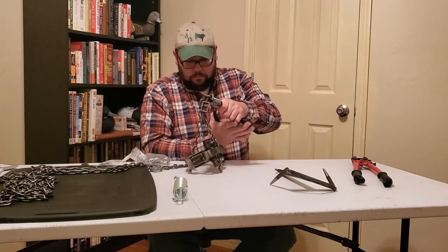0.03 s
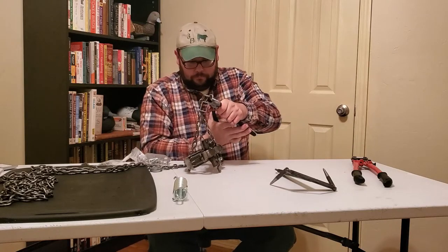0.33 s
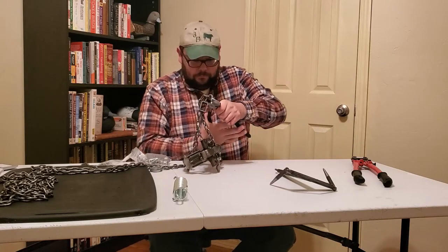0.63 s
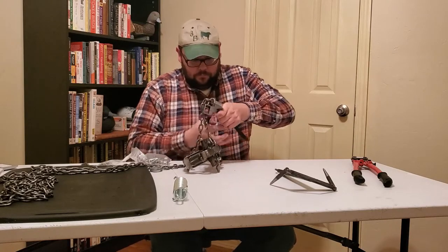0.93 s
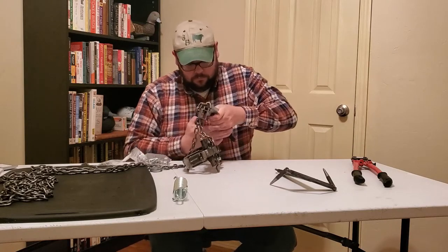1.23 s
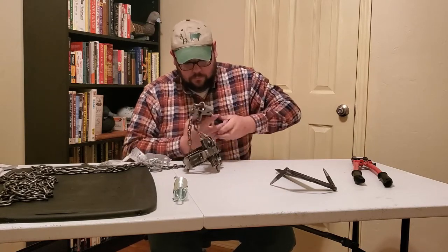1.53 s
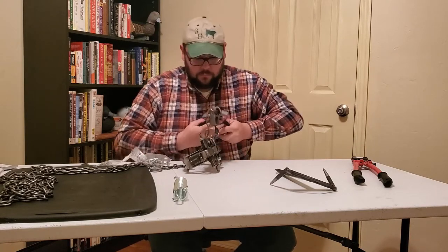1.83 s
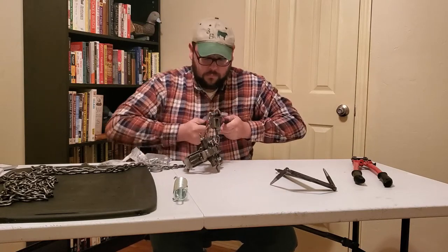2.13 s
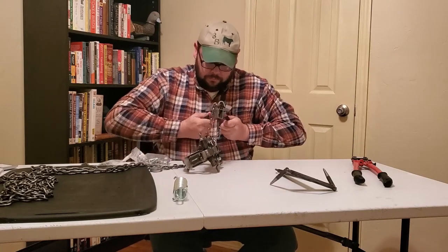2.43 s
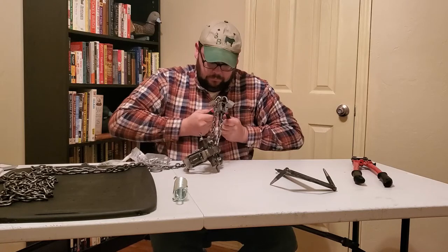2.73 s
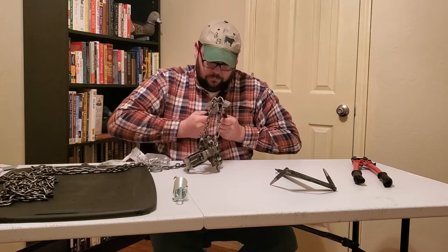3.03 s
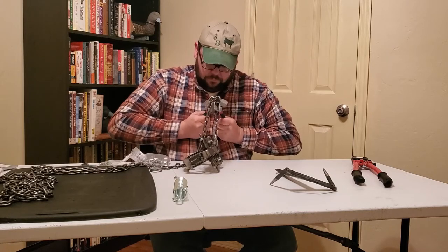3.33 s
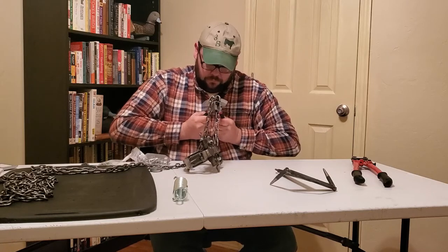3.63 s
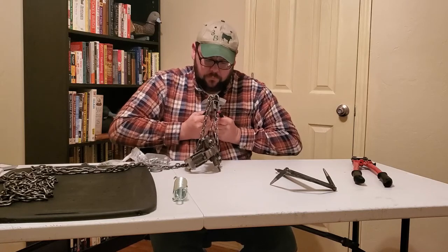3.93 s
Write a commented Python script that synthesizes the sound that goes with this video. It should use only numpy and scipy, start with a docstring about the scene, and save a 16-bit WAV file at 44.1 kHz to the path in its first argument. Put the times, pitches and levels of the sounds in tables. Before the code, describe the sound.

A chain and steel trap are handled, starting with a few light clicks. From about 0.8 seconds the links clash and jangle in quick, uneven runs, with hollow knocks on a table. The rattle is brightest around 2 and 2.8 seconds, thins after 3, nearly pauses, then clatters again with a knock near 3.9. It sounds a few metres away in a small, reverberant room.

```python
"""Steel trap and chain on a table

A trap and its chain are handled in a small, live room, a few metres away. Links clash in short runs of
impacts that excite the damped modes of the steel; between the clashes the chain keeps jostling.
Now and then the trap knocks on the hollow table top, which resonates. Reverberation outweighs the
direct sound, and a faint hush lies beneath."""
import sys
import numpy as np
from scipy import signal
from scipy.fft import rfft, irfft, next_fast_len
from scipy.io import wavfile

SR = 44100
rng = np.random.default_rng(int(sys.argv[2]) if len(sys.argv) > 2 else 0)


def store_pcm(level_fs):
    """Save levels as 16-bit WAV."""
    pcm = np.round(np.clip(level_fs, -1, 1) * 32767).astype(np.int16)
    wavfile.write(sys.argv[1], SR, np.atleast_2d(pcm).T)


N = 176400

# All table levels are relative. Clashes of chain and trap: (t/s, body/dB, ring/dB, sparkle/dB)
CLASH_EVENTS = [(0.001, -43, -42, -45), (0.355, -50, -61, -61), (0.572, -50, -57, -66),
                (0.765, -35.5, -36, -47), (0.805, -24, -27, -29), (0.915, -28.5, -25.5, -26.5),
                (1.079, -30.5, -28.5, -24), (1.105, -25, -29, -31), (1.203, -26.5, -28, -27.5),
                (1.222, -28.5, -38.5, -34), (1.368, -36, -26, -23.5), (1.404, -24.5, -31.5, -30.5),
                (1.471, -42, -29, -29), (1.645, -38, -26, -40), (1.674, -40, -34, -27),
                (1.77, -40, -25.5, -23), (1.893, -36, -24.5, -22), (1.911, -43, -20, -24.5),
                (1.932, -24.5, -24, -23), (1.988, -30, -23, -21.5), (2.098, -31, -28.5, -32.5),
                (2.215, -53, -35.5, -30.5), (2.27, -35, -30, -27), (2.33, -28.5, -33, -37),
                (2.339, -29.5, -36.5, -26), (2.419, -30, -28, -24.5), (2.508, -28, -24, -26),
                (2.63, -24.5, -25, -27), (2.667, -49, -37, -28), (2.711, -52, -25.5, -23.5),
                (2.758, -27, -25.5, -28.5), (2.811, -27, -17, -20), (2.937, -23, -35, -43),
                (3.08, -30, -34.5, -40), (3.095, -30, -29.5, -31), (3.197, -60, -36.5, -32.5),
                (3.271, -35.5, -29.5, -34), (3.416, -51, -40, -37), (3.44, -35, -37, -38),
                (3.584, -36, -58, -71), (3.823, -44.5, -48.5, -57), (3.895, -45, -39, -44.5),
                (3.923, -28, -41, -53), (3.938, -49, -26.5, -26)]
# modes of the trap's frame: (f/Hz, level/dB, T60/s)
FRAME_MODES = [(1703, -6.5, 0.11), (1843, -2, 0.048), (2092, -3.5, 0.028), (2343, -8, 0.07),
               (2675, -12, 0.056), (3545, 0.5, 0.017), (4195, -21.5, 0.053)]
# spectral envelope of the links: (f/Hz, level/dB)
LINK_SPECTRUM = [(120, -18), (600, -2.5), (1050, 1), (1350, -0.5), (1850, 5), (2800, -3.5), (3900, 0),
                 (6200, -3.5), (8000, -12), (9500, -6), (11500, -7), (13000, -2), (15500, -10.5)]
# strikes on parts that swing free: (t/s, part, level/dB)
PING_EVENTS = [(.001, "jaw", -55), (0.571, "jaw", -51.5), (.763, "jaw", -38.5), (0.915, "jaw", -34),
               (1.203, "jaw", -35.5), (1.222, "jaw", -54), (1.372, "swivel", -36), (1.47, "swivel", -27),
               (1.675, "swivel", -24), (1.77, "jaw", -27.5), (1.771, "base", -36.5), (1.906, "base", -35),
               (1.935, "spring", -30.5), (2.096, "clip", -35.5), (2.339, "spring", -28),
               (2.508, "swivel", -29.5), (2.634, "spring", -41), (2.836, "swivel", -23.5),
               (3.093, "clip", -35), (3.442, "clip", -43), (3.5, "spring", -47)]
# modes of each free part: (f/Hz, level/dB)
PING_MODES = {"jaw": [(1885, -12), (3684, 7), (3790, -15), (5600, -2)], "base": [(1045, -2), (1110, -4.5),
              (1900, 3.5)], "spring": [(1850, 8), (1950, 5), (3590, 10.5), (5520, 7)],
              "swivel": [(9000, -3), (9566, -3), (12200, 1.5), (12600, 0), (12900, 1), (14400, 0),
              (14900, 2.5), (15300, -11)], "clip": [(9480, 11.5), (10430, 13.5)]}
# decay of each free part: T60/s
PING_T60_S = {"jaw": .045, "base": .06, "spring": .025, "swivel": .02, "clip": .05}
# knocks on the table: (t/s, boom/dB, thump/dB, clack/dB, hollow note f/Hz, hollow note level/dB)
KNOCK_EVENTS = [(0.371, -54.5, -59, -75, 128, -54.5), (0.777, -51.5, -43, -48, 163, -56),
                (0.817, -58, -40.5, -42, 717, -34), (1.09, -52.5, -42, -47.5, 325, -46),
                (1.24, -62, -42.5, -43, 314, -45), (1.403, -56, -41, -31, 378, -33.5),
                (2.572, -52, -45, -39.5, 280, -53), (2.775, -51, -47.5, -40, 686, -43.5),
                (2.869, -50, -50, -57, 128, -44), (2.937, -50.5, -40, -34.5, 296, -39),
                (3.079, -52.5, -44, -38, 500, -34.5), (3.583, -66, -52, -47, 520, -42),
                (3.921, -48, -39.5, -41, 543, -35), (3.951, -43, -50, -49, 720, -43)]
# modes of the table top: (f/Hz, level/dB, T60/s)
TOP_MODES = [(123.7, -6, 0.2), (215.7, -6, 0.18), (266, 9, 0.078), (360.5, 4.5, 0.086), (525, 8, 0.046),
             (671, 10.5, 0.056)]
# spectral envelope of an impact on the top: (f/Hz, level/dB)
TOP_SPECTRUM = [(30, -45), (65, -2), (125, -7.5), (260, 5.5), (450, 2.5), (800, -5), (1200, -2),
                (2000, -15.5), (6000, -54)]
# strength of the jostling: (t/s, links/dB, dragging/dB)
JOSTLE_LEVELS = [(0, -86, -45), (.33, -71, -102), (.42, -58.5, -55), (.74, -58, -56), (.9, -33.5, -43.5),
                 (1.33, -36.5, -41), (1.8, -33, -43), (2.22, -46, -47), (2.6, -29, -39), (3.05, -49, -46.5),
                 (3.499, -38.5, -49), (3.63, -63.5, -59), (3.8, -59.5, -51), (4, -24.5, -44)]
# reverberation time: (f/Hz, T60/s)
REVERB_TIMES = [(100, 0.69), (400, 0.39), (2000, 0.63), (5000, 0.48), (10000, 0.45), (16000, 0.28)]
# coherence of the diffuse field: (f/Hz, left-right correlation)
FIELD_COHERENCE = [(100, 0.74), (300, 0.8), (700, 0.19), (1500, 0.024), (8000, 0.0055)]
# balance of the diffuse field: (f/Hz, left over right/dB)
FIELD_BALANCE = [(100, 0.5), (700, -0.5), (1400, 3.5), (2800, 0.5), (5500, -1), (10000, -1), (15000, 1.5)]
# spectrum of the still room: (f/Hz, level/dB)
HUSH_SPECTRUM = [(28, -43), (59, 11), (184, -8.5), (345, 6.5), (426, -10), (1720, -6), (16000, -65)]

CLASH_DB, PING_DB, KNOCK_DB, LINKS_DB, DRAG_DB, HUSH_DB = -6, .5, 2.5, -3.5, -2, -63.5
CRACK_DB, FRAME_DB, TOP_RING_DB = 3.5, -7, -1.5
BODY_EDGE_HZ, SPARKLE_EDGE_HZ, CUTOFF_HZ = 2820, 8120, 16100
BOOM_EDGE_HZ, THUMP_EDGE_HZ, HOLLOW_WIDTH_OCT = 137.5, 365, 0.4
LINK_T60_S, CRACK_T60_S, KNOCK_T60_S = 0.024, 0.013, 0.017
CLASH_RUN_S, KNOCK_RUN_S, SWIVEL_RUN_S = .022, 0.027, 0.0088  # spans of the bouncing
BOUNCES, BOUNCE_DB, BOUNCE_SPREAD_DB, SWIVEL_BOUNCE_DB = 6, -2, 4.5, -1
JOSTLES_PER_S, JOSTLE_SPREAD_DB, JOSTLE_DULL_HZ, DRAG_LOW_CUT_HZ = 130, 3, 9200, 179
DIRECT_DB, FIRST_ECHO_S, BUILD_UP_S = -11, 0.001, 0.0022
HIT_SAMPLES = SR // 3
HIT_SCALE = np.sqrt(.04 * SR)  # turns unit energy into unit power over 40 ms


def clashes():
    """Impacts excite a broad spectrum; each clash divides its energy differently among three bands."""
    out = np.zeros((2, N))
    for start, body_db, ring_db, sparkle_db in CLASH_EVENTS:
        hit = steel(CLASH_RUN_S)
        body = from_db(body_db) * unit(cut(hit, BODY_EDGE_HZ, "low"))
        ring = from_db(ring_db) * unit(cut(hit, [BODY_EDGE_HZ, SPARKLE_EDGE_HZ], "band"))
        sparkle = from_db(sparkle_db) * unit(cut(hit, SPARKLE_EDGE_HZ, "high"))
        add(out, start, body + ring + beamed(sparkle))
    return from_db(CLASH_DB) * HIT_SCALE * out


def steel(run_s, modes=40, bands=28):
    """Impact excitation: steel on steel cracks and sets the links and the frame in free vibration."""
    hz = rng.uniform(1510, CUTOFF_HZ, modes)
    t60 = LINK_T60_S * rng.uniform(.5, 2, modes)
    links = modal_ring(np.c_[hz, np.zeros(modes), t60], spread_db=1.5)
    grid_hz = np.r_[np.geomspace(120, 2800, bands), np.linspace(3200, CUTOFF_HZ, bands)]
    # each contact has its own treble colour
    tint_db = 3 * rng.standard_normal(len(grid_hz)) * (grid_hz > BODY_EDGE_HZ)
    spectrum = np.c_[grid_hz, at_hz(LINK_SPECTRUM, grid_hz) + tint_db]
    contact = colour(from_db(CRACK_DB) * crack(CRACK_T60_S, run_s) + links, spectrum)
    frame = modal_ring(FRAME_MODES, spread_db=5, detune=.022)
    return unit(contact) + from_db(FRAME_DB) * cut(frame, 690, "high", order=2)


def crack(t60, run_s):
    """Incoherent addition: a contact and its bounces are decaying noise bursts whose powers sum."""
    power = np.zeros(HIT_SAMPLES)
    power[0] = 1
    bounces = (rng.random(BOUNCES) * run_s * SR).astype(int)
    power[bounces] += from_db(BOUNCE_DB + BOUNCE_SPREAD_DB * rng.standard_normal(BOUNCES)) ** 2
    retained = from_db(-60 / (t60 * SR)) ** 2
    envelope = np.sqrt(signal.lfilter([1], [1, -retained], power + 1e-18))
    return unit(rng.standard_normal(HIT_SAMPLES) * envelope)


def modal_ring(modes, spread_db=3, detune=.004):
    """Free vibration is a sum of damped modes; strength and tuning vary with each strike and grip."""
    hz, db, t60 = np.transpose(modes)
    hz = hz * (1 + detune * rng.standard_normal(len(hz)))
    gain = from_db(db + spread_db * rng.standard_normal(len(hz))) * rng.choice([-1, 1], len(hz))
    age = np.float32(np.arange(HIT_SAMPLES) / SR)
    phase = np.outer(np.float32(2 * np.pi * hz), age)
    loss = np.outer(np.float32(np.log(1000) / t60), age)
    return unit(gain @ (np.sin(phase) * np.exp(-np.minimum(loss, 20))))


def pings(touches=3):
    """A struck part rings at its natural frequencies; the loose swivel bounces, shifting in pitch."""
    out = np.zeros((2, N))
    for start, part, db in PING_EVENTS:
        modes = [(hz, level, PING_T60_S[part]) for hz, level in PING_MODES[part]]
        if part == "swivel":
            shares = unit(from_db(SWIVEL_BOUNCE_DB * np.arange(touches)))
            for k, share in enumerate(shares):
                ping = share * from_db(db) * modal_ring(modes, detune=.012)
                add(out, start + SWIVEL_RUN_S * k / touches, beamed(ping))
        else:
            ping = from_db(db) * modal_ring(modes, spread_db=2.5)
            add(out, start, beamed(ping) if part == "clip" else ping)
    return from_db(PING_DB) * HIT_SCALE * out


def beamed(x, pan_db=5.5):
    """Directivity: the highest sounds beam to the left."""
    return np.sqrt(2) * unit(from_db([pan_db / 2, -pan_db / 2]))[:, None] * x


def knocks():
    """Resonance: the trap lands and chatters, each spot has its hollow note, and heavy landings boom."""
    out = np.zeros(N)
    for start, boom_db, thump_db, clack_db, hollow_hz, hollow_db in KNOCK_EVENTS:
        hit = table_top(KNOCK_RUN_S)
        boom = cut(hit, BOOM_EDGE_HZ, "low")
        thump = cut(hit, [BOOM_EDGE_HZ, THUMP_EDGE_HZ], "band", order=3)
        clack = cut(hit, THUMP_EDGE_HZ, "high")
        hollow_band = hollow_hz * 2 ** (HOLLOW_WIDTH_OCT * np.array([-.5, .5]))
        hollow = cut(crack(KNOCK_T60_S, 0), hollow_band, "band", order=2)
        gains = from_db([boom_db, thump_db, clack_db, hollow_db])
        add(out, start, gains @ unit(np.array([boom, thump, clack, hollow])))
    return from_db(KNOCK_DB) * HIT_SCALE * out


def table_top(run_s):
    """Plate vibration: steel on the table gives a dull clack and excites the modes of the top."""
    ring = cut(modal_ring(TOP_MODES, spread_db=2.5), 67, "high", order=2)
    clack = unit(colour(crack(KNOCK_T60_S, run_s), TOP_SPECTRUM))
    return clack + from_db(TOP_RING_DB) * ring


def jostle(count=10):
    """Many small impacts merge into a rattle as links shift on each other and drag on the table."""
    times, links_db, drag_db = np.transpose(JOSTLE_LEVELS)
    t = np.arange(N) / SR
    links = [cut(steel(0), JOSTLE_DULL_HZ, "low", order=2) for _ in range(count)]
    taps = [cut(table_top(0), DRAG_LOW_CUT_HZ, "high", order=2) for _ in range(count // 2)]
    rattle = patter(links, np.interp(t, times, links_db) + LINKS_DB)
    drag = patter(taps, np.interp(t, times, drag_db) + DRAG_DB)
    return rattle + drag


def patter(sounds, level_db):
    """A Poisson process: contacts fall at independent moments, each making one of the given sounds."""
    touching = rng.random(N) < JOSTLES_PER_S / SR
    strength = from_db(JOSTLE_SPREAD_DB * rng.standard_normal(N)) * rng.choice([-1, 1], N)
    impulses = np.sqrt(N) * unit(touching * strength) * from_db(level_db)
    choice = rng.integers(0, len(sounds), N)
    return sum(signal.oaconvolve(impulses * (choice == k), unit(x))[:N] for k, x in enumerate(sounds))


def carried(x, places=6):
    """Echoes depend on source position: as the trap is carried, one pattern fades into the next."""
    place = np.linspace(0, places - 1, N)
    return sum(room(x * np.sqrt(np.maximum(1 - abs(place - k), 0))) for k in range(places))


def room(x, bands=10):
    """Reverberation: dense echoes follow a weak direct sound and die soonest in the high treble."""
    t, hz = np.arange(SR) / SR, np.fft.rfftfreq(SR, 1 / SR)
    centres = np.geomspace(100, CUTOFF_HZ, bands)
    spectrum = rfft(diffuse_field(SR))
    tail = np.zeros((2, SR))
    for centre, share in zip(centres, np.eye(bands)):
        band = irfft(spectrum * at_hz(np.c_[centres, share], hz))
        tail += band * from_db(-60 * t / at_hz(REVERB_TIMES, centre))
    response = unit(tail * np.clip((t - FIRST_ECHO_S) / BUILD_UP_S, 0, 1))
    response[:, 0] += from_db(DIRECT_DB)
    return signal.fftconvolve(x, response, axes=1)[:, :N]


def diffuse_field(size):
    """Spatial coherence: room noise at two points is alike in the bass, unrelated in the treble."""
    hz = np.fft.rfftfreq(size, 1 / SR)
    mid, side = rfft(rng.standard_normal((2, size)))
    coherence, sign = at_hz(FIELD_COHERENCE, hz), np.array([[1], [-1]])
    pair = np.sqrt(1 + coherence) * mid + np.sqrt(1 - coherence) * side * sign
    return irfft(pair * from_db(sign * at_hz(FIELD_BALANCE, hz) / 2), size)


def hush():
    """Ambient noise: the still room holds a faint, steady diffuse field, strongest in the bass."""
    return from_db(HUSH_DB) * np.sqrt(N) * unit(colour(diffuse_field(N), HUSH_SPECTRUM))


def from_db(db):
    """Decibels to amplitude ratio."""
    return 10 ** (np.asarray(db) / 20)


def unit(x):
    """Normalisation to unit energy."""
    return x / np.sqrt(np.sum(x ** 2, axis=-1, keepdims=True) + 1e-20)


def at_hz(points, hz):
    """Interpolation on a log-frequency axis."""
    f, values = np.transpose(points)
    return np.interp(np.log(np.maximum(hz, 1)), np.log(f), values)


def colour(x, points):
    """Minimum-phase filter: folding the cepstrum makes the given dB curve causal."""
    size = next_fast_len(x.shape[-1] + SR // 8)
    size += size % 2
    gain = from_db(at_hz(points, np.fft.rfftfreq(size, 1 / SR)))
    cepstrum = irfft(np.log(gain))
    cepstrum[1:size // 2] *= 2
    cepstrum[size // 2 + 1:] = 0
    return irfft(rfft(x, size) * np.exp(rfft(cepstrum)))[..., :x.shape[-1]]


def cut(x, hz, kind, order=4):
    """Maximally flat filter."""
    return signal.sosfilt(signal.butter(order, hz, kind, fs=SR, output="sos"), x + 1e-18)


def add(out, start_s, sound):
    """Superposition of one hit on the mix."""
    i = int(start_s * SR)
    out[..., i:i + HIT_SAMPLES] += sound[..., :N - i]


def scene():
    """Superposition: all the hardware sounds in one room, over its hush."""
    return hush() + carried(clashes() + pings() + knocks() + jostle())


def record(dry):
    """Band limiting: a steep elliptic low-pass removes the highest treble."""
    return signal.sosfilt(signal.ellip(10, .2, 75, CUTOFF_HZ, fs=SR, output="sos"), dry)


dry = scene()
out = record(dry)
store_pcm(out)
```